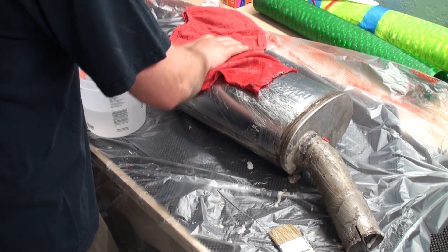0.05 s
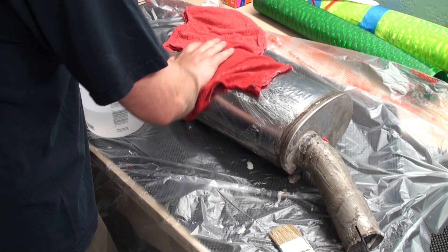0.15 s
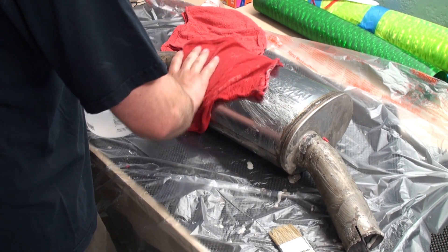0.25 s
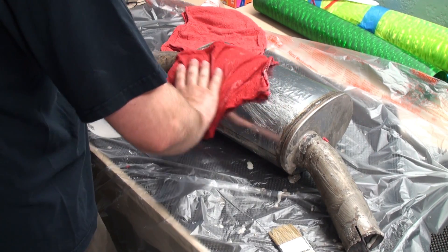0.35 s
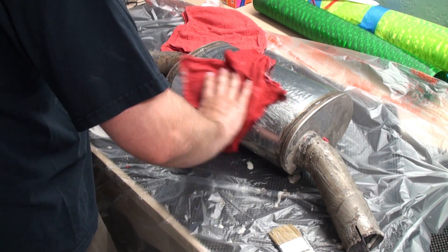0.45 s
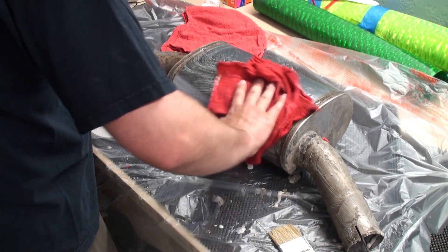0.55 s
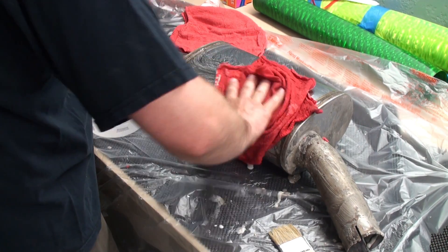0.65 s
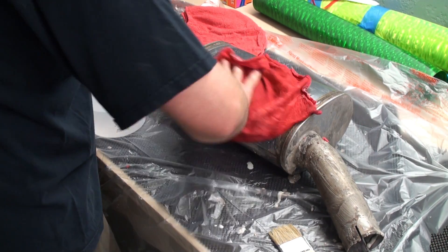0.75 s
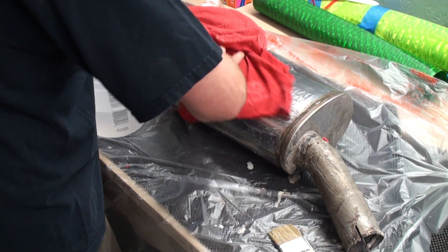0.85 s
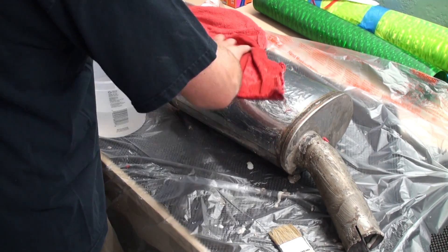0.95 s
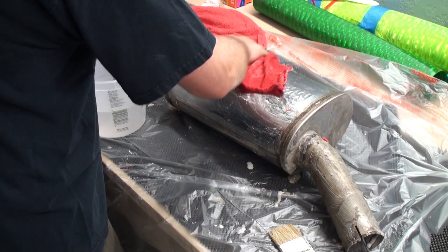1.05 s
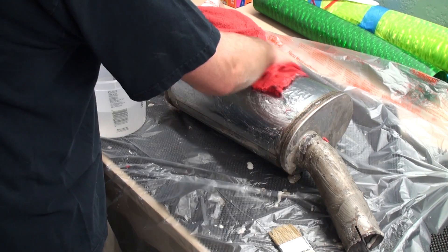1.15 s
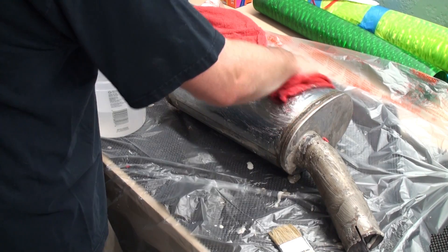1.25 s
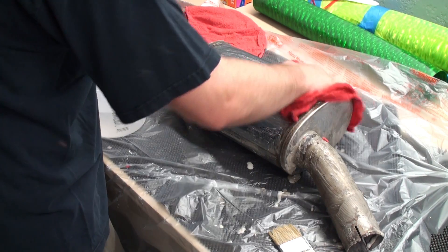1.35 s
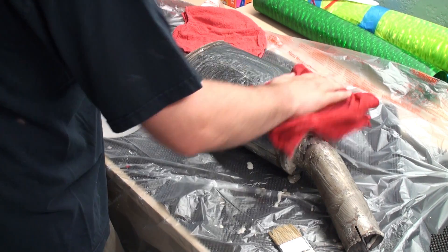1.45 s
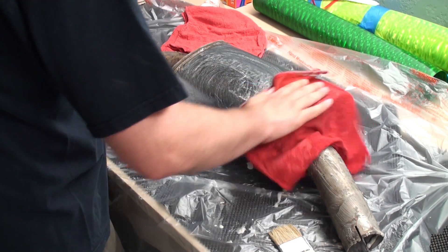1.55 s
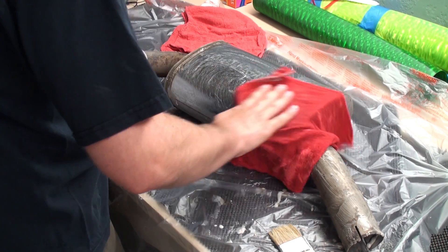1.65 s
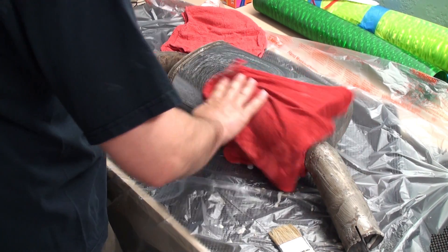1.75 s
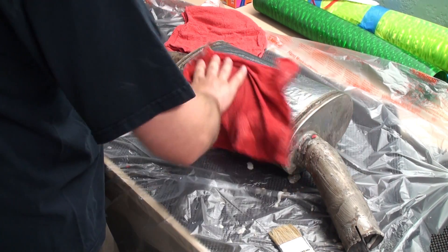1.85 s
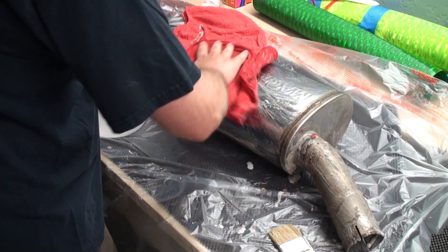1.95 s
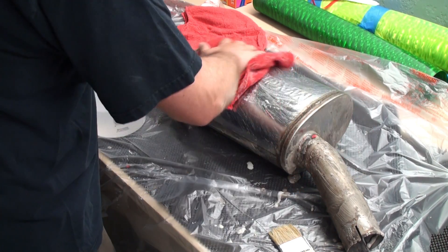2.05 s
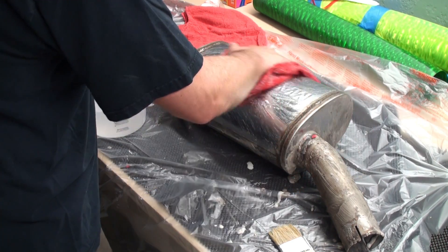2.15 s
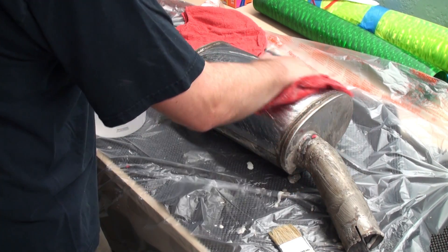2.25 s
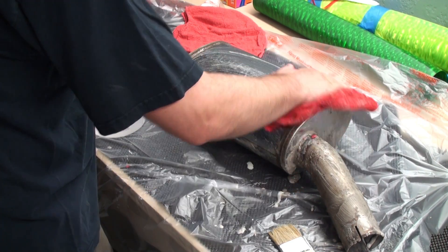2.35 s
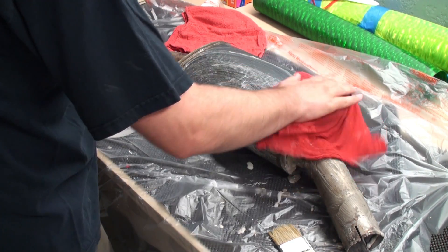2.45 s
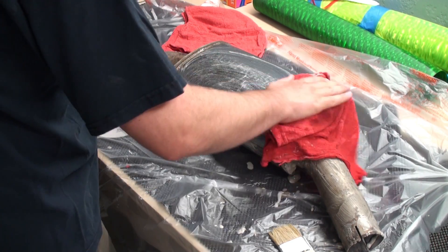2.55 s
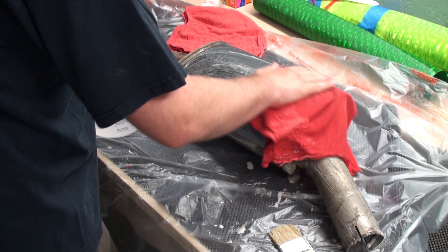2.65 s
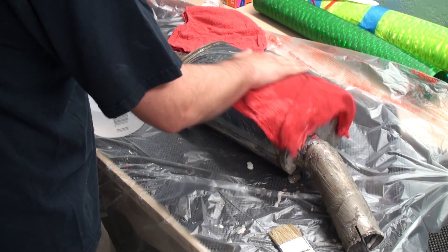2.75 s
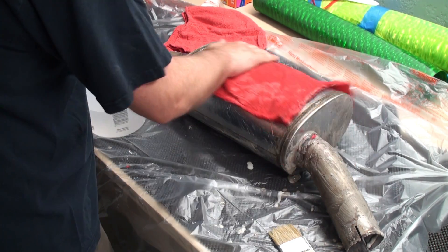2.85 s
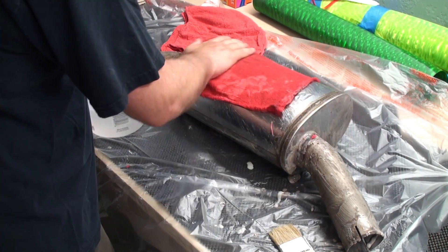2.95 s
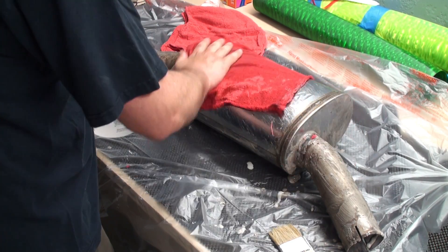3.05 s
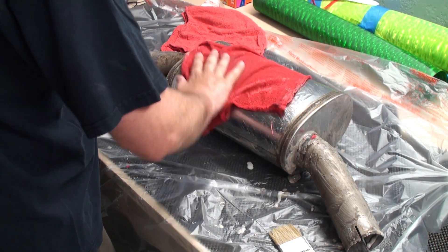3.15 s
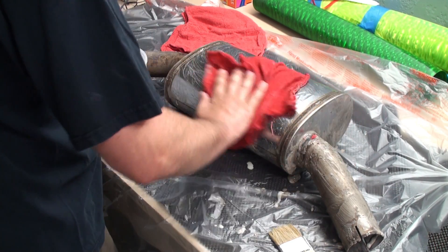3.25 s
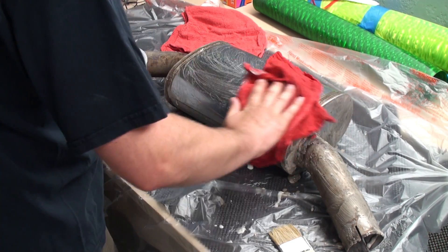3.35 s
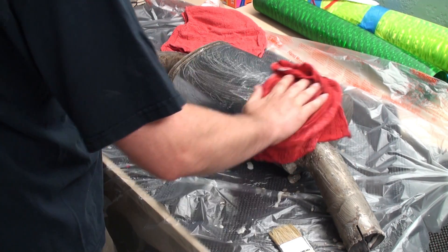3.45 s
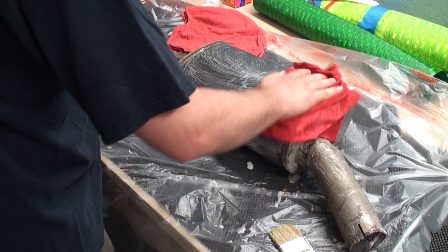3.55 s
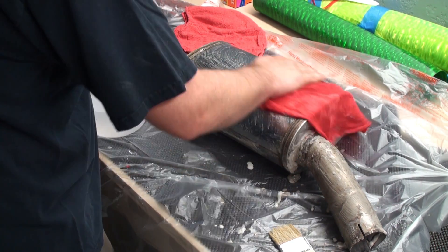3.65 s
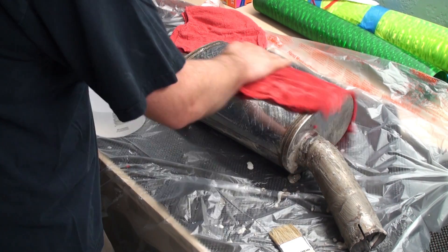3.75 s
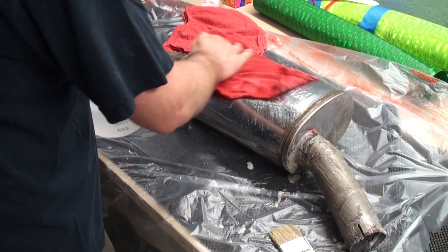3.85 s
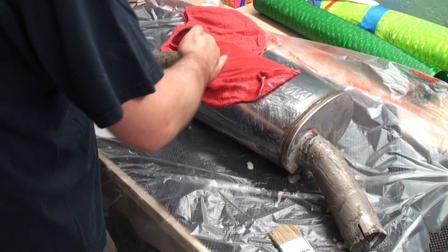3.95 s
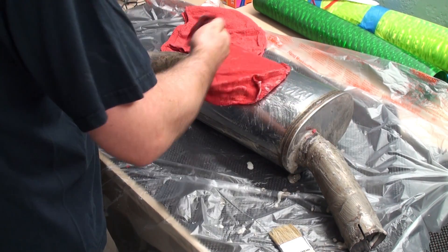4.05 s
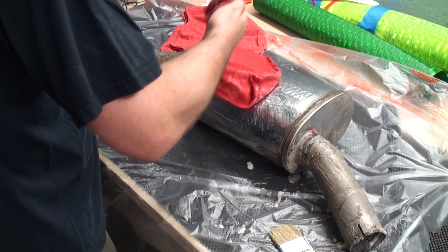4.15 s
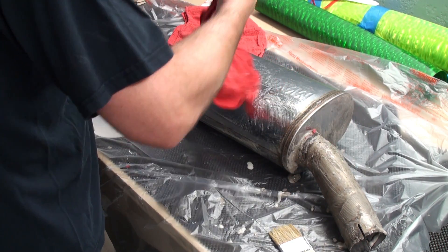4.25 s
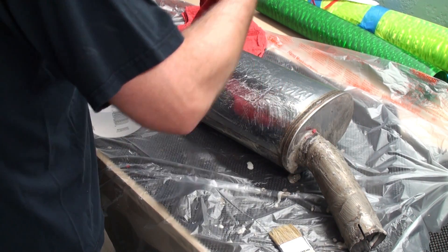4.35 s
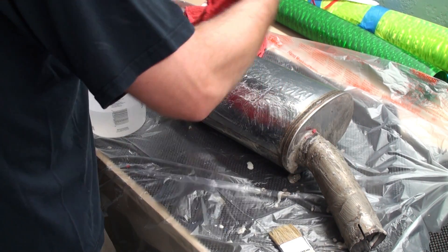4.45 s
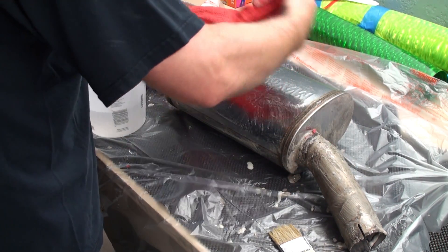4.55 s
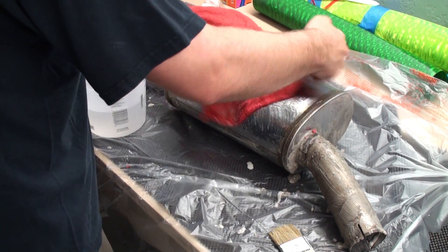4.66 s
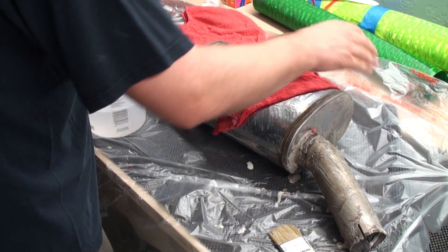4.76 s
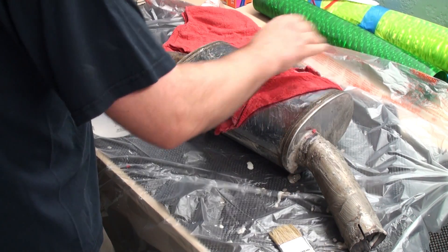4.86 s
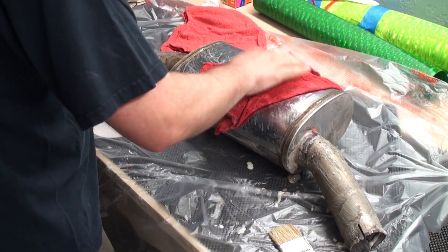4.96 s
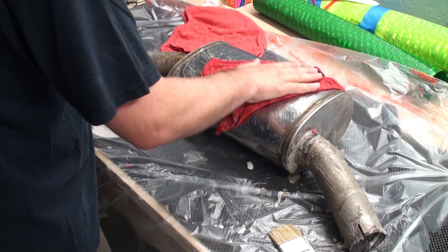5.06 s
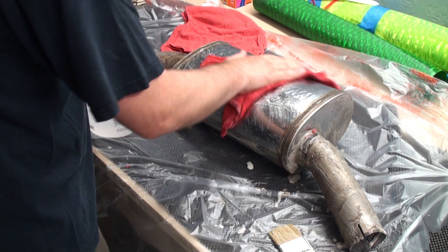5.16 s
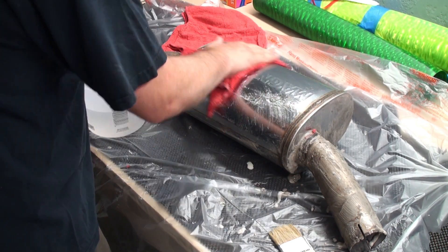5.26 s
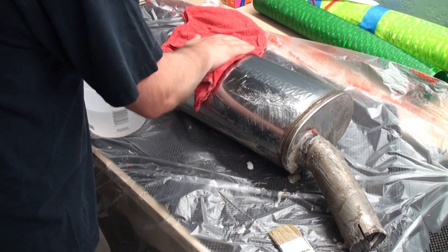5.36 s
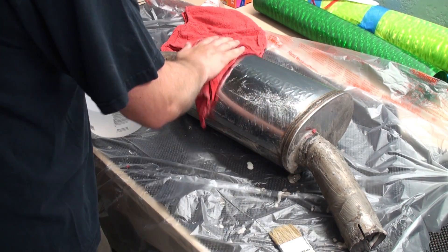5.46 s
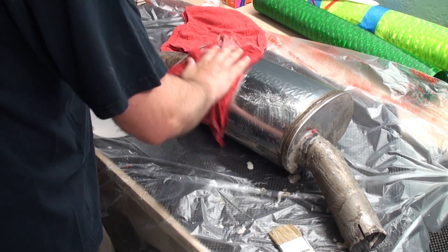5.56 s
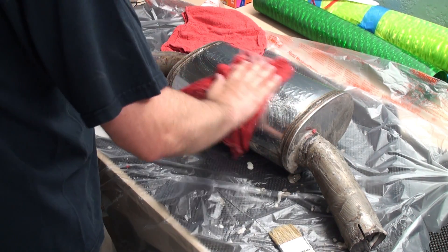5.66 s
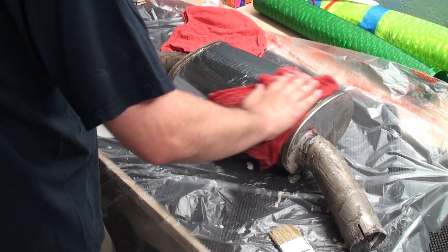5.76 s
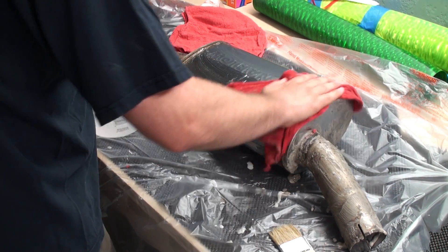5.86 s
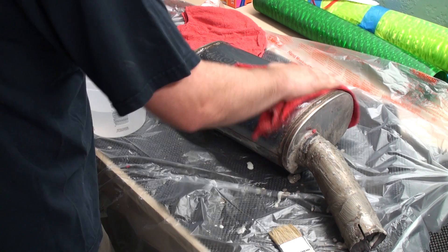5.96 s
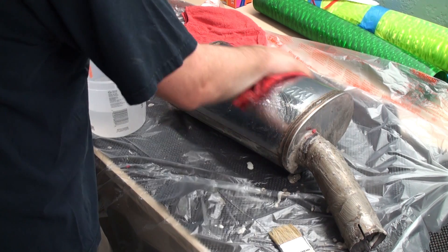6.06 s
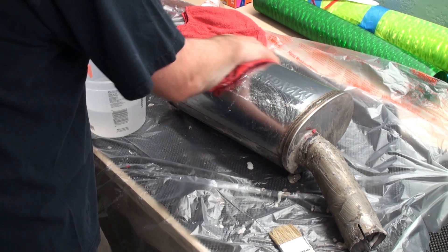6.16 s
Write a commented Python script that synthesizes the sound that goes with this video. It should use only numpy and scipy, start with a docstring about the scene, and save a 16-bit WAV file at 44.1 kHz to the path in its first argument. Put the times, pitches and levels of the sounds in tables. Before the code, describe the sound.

Wet scrubbing on a metal exhaust can lying on a bench, heard close with short room reflections. Swishing strokes rise and fall two or three times a second, bright and crackly with foam, over a soft hollow resonance. Two strong watery spurts stand out in the first half, along with tiny bubble pips and a thin squeak. Then comes a gap, one loud wet smack on the shell, a soft shuffle and renewed rubbing over faint room hum.

```python
"""Wet scrubbing hisses and fizzes back and forth over a steel muffler, above a low hum in a small workshop.
Dense crackles make the rag and suds, and each pass also sets the shell's damped modes ringing softly.
Shaped bursts of the same kind of grain squirt water out of the folds; damped tones add pips and nudges.
Near the end the scrubbing pauses, the rag slaps the metal once with a throbbing ring, and new passes follow."""
import sys
import numpy as np
from scipy import signal
from scipy.fft import rfft, irfft
from scipy.io import wavfile

SR = 44100
rng = np.random.default_rng(int(sys.argv[2]) if len(sys.argv) > 2 else 0)


def bounce(signal):
    """Save signal as a 16-bit WAV file at the path given by the first command-line argument."""
    frames = np.transpose(np.atleast_2d(signal))
    limited = np.clip(frames, -1, 1)
    pcm = np.round(limited * 32767).astype(np.int16)
    wavfile.write(sys.argv[1], SR, pcm)


N = 273420
TIME = np.arange(N) / SR
BINS = np.fft.rfftfreq(N, 1 / SR)


def amp(db):
    """Decibels to gain."""
    return 10 ** (np.asarray(db) / 20)


def unit(x):
    """Scales to rms 1."""
    return x / np.sqrt(np.mean(x ** 2) + 1e-20)


def read(points, hz):
    """Reads a table along a log-frequency axis."""
    f, value = np.transpose(points)
    return np.interp(np.log(hz + 1), np.log(f + 1), value)


def tilt(x, points):
    """Applies a table of gains in dB to the spectrum."""
    return irfft(rfft(x) * amp(read(points, BINS)), N)


def colour(x, points):
    """Gives a sound a spectrum, at rms 1."""
    return unit(tilt(x, points))


def wander(rate_hz):
    """Slow chance of rms 1, up to about the given rate."""
    return unit(irfft(rfft(rng.standard_normal(N)) / (1 + (BINS / rate_hz) ** 4), N))


def crackle(per_s, spread_db, share):
    """Tiny bursts of unequal size over a blur of countless smaller ones; share is the bursts' part of the power."""
    sizes = amp(spread_db * np.minimum(rng.exponential(1, N), 4))
    happens = rng.random(N) < per_s / SR
    clicks = sizes * rng.choice([-1., 1.], N) * happens
    share = np.clip(share, 0, 1)
    return np.sqrt(share) * unit(clicks) + np.sqrt(1 - share) * rng.standard_normal(N)


def burst(start_s, swell_s, decay_s):
    """An envelope that swells to 1 and dies away, falling to 1/e in decay_s."""
    age = np.maximum(TIME - start_s, 0)
    attack = np.sqrt(np.minimum(age / swell_s, 1))
    return attack * np.exp(-np.maximum(age - swell_s, 0) / decay_s)


def pings(rows, swell_s):
    """Single damped sine tones, each under its own burst."""
    return sum(amp(db) * burst(s, swell_s, decay) * np.sin(2 * np.pi * hz * (TIME - s))
               for s, hz, db, decay in rows)


# stereo spread of the moving source: pitch_hz [Hz], side_against_common_db [dB]
WIDTH = [(200, -43), (1000, -12), (3000, -39.5), (6500, -49), (8200, -19), (10000, -8.5), (12000, -4.5),
         (13500, -6.5), (15800, -5)]


def wet(grains, points):
    """Coloured grains at the two microphones, each grain leaning a little to one side; common sound at rms 1."""
    side = tilt(grains * rng.standard_normal(N), WIDTH)
    pair = tilt(np.array([grains + side, grains - side]), points)
    return pair / np.std(pair.mean(0))


# mains and motor tones: pitch_hz [Hz], level_db [dB rms]
HUM_TONES = [(58, -66), (89, -68), (120, -61), (138.7, -58), (240, -79.5)]
# colour of the room's rush: pitch_hz [Hz], relative_level_db [dB per Hz]
AIR_COLOUR = [(20, -18), (36, -10), (60, -15), (80, -12), (130, 3.5), (180, -0.5), (300, -7), (450, -10),
              (1000, -11), (2000, -12.5), (4000, -18), (8000, -21), (12000, -22.5), (15800, -29)]
# how far the rush spreads: pitch_hz [Hz], side_against_common_db [dB]
AIR_SPREAD = [(110, -53), (200, -28), (400, -4.5), (700, 0), (4500, -0.5), (15800, -7)]


def background(air_db=-57, waver_rad=0.15):
    """A hum of sines with slightly wavering phase, over coloured noise that comes from all sides."""
    hum = np.zeros(N)
    for hz, db in HUM_TONES:
        phase = 2 * np.pi * (hz * TIME + rng.random()) + waver_rad * wander(rate_hz=2.2)
        hum += amp(db) * np.sqrt(2) * np.sin(phase)
    common = colour(rng.standard_normal(N), AIR_COLOUR)
    side = tilt(colour(rng.standard_normal(N), AIR_COLOUR), AIR_SPREAD)
    return hum + amp(air_db) * np.array([common + side, common - side])


# loudness of the reflections: pitch_hz [Hz], echo_level_db [dB]
ROOM_LEVEL = [(60, -49), (150, -24), (280, -11), (1000, -21.5), (2000, -10.5), (4000, -12), (6500, -18.5),
              (9000, -11.5), (15800, -23)]
# length of the reflections: pitch_hz [Hz], t60_s [s]
ROOM_DECAY = [(200, 0.71), (2000, 0.48), (7000, 0.17), (15800, 0.23)]


def room(x):
    """Bench and wall reflections as decaying noise, different at each microphone, treble shorter than bass."""
    hz, t, z = signal.stft(rng.standard_normal((2, SR // 2)), SR, nperseg=256)
    t60_s = read(ROOM_DECAY, hz)[:, None]
    energy = SR * t60_s / np.log(10 ** 6)  # keeps a long tail from sounding louder
    tail = signal.istft(z * amp(-60 * t / t60_s) / np.sqrt(energy), SR, nperseg=256)[1]
    sent = tilt(x.mean(0), ROOM_LEVEL)
    return signal.fftconvolve(sent[None], tail, axes=1)[:, :N]


# dull knocks of the bench: start_s [s], pitch_hz [Hz], level_db [dB], decay_s [s to 1/e]
NUDGES = [(0.22, 60, -51, .05), (1.2, 64, -50, .05), (2.43, 60.4, -51, 0.044), (3.92, 57.4, -54, 0.093),
          (4.27, 59, -54, .08), (5.09, 62.4, -46.5, .05), (5.205, 62.3, -48, 0.058)]


def nudges():
    """The bench gives low, damped thuds when nudged."""
    return pings(NUDGES, swell_s=0.015)


# small pips: two low bubbles and a thin 3 kHz squeak of the cloth:
# start_s [s], pitch_hz [Hz], level_db [dB], decay_s [s to 1/e]
PIPS = [(2.82, 1480, -42, 0.0074), (2.833, 818, -44, 0.013), (3.55, 3070, -40, .03)]


def pips():
    """Two bubbles and a squeak of the cloth, each a short damped tone."""
    return pings(PIPS, swell_s=0.0093)


# modes of the muffler, damped by wet cloth: pitch_hz [Hz], relative_level_db [dB], t60_s [s]
SHELL_MODES = [(248.7, -11, 0.39), (259.6, -12, 0.23), (472.5, -5, 0.14), (519, -1.5, 0.14),
               (574.8, 2, 0.17), (589, 0, 0.091), (613, -0.5, 0.19), (653, -15, 0.086), (794, -1, 0.2),
               (1003, -0.5, 0.06), (1245, -6.5, 0.21), (1364, -9, 0.25), (1495, 1, 0.11),
               (1960, -3.5, 0.092), (2140, -20, 0.23), (2660, -17, 0.1)]


def shell(push):
    """The muffler's modes ring under a push; steady noise keeps its level."""
    t = TIME[:SR // 2]
    ring = sum(amp(db - 60 * t / t60) * np.cos(2 * np.pi * hz * t) for hz, db, t60 in SHELL_MODES)
    return signal.fftconvolve(push, ring / np.linalg.norm(ring))[:N]


# a light early flop, then the main slap and its throbbing tail:
# start_s [s], smack_db [dB], decay_s [s to 1/e], blow_to_shell_db [dB]
SLAPS = [(3.69, -44, 0.043, -18), (4.743, -35, 0.03, -10), (4.768, -45.5, 0.075, -19), (4.8, -72, .02, -21),
         (4.822, -62, 0.064, -24)]
# colour of the wet smack: pitch_hz [Hz], relative_level_db [dB per Hz]
SMACK_COLOUR = [(100, -27), (250, 2), (370, -1), (560, 9.5), (760, -4.5), (1000, 2.5), (1500, -3),
                (2500, -3.5), (6000, -5.5), (9000, -10.5), (12000, -20), (15800, -32)]


def slaps(swell_s=0.0013, contact_s=0.00061, settle_db=-25, settle_decay_s=0.018):
    """Wet smacks and blows on the shell; the later rows imitate the throb of close modes beating after one slap."""
    splat = wet(crackle(per_s=8400, spread_db=9.0, share=0.17), SMACK_COLOUR)
    smack = sum(amp(db) * burst(s, swell_s, decay) for s, db, decay, _ in SLAPS)
    settling = amp(settle_db) * rng.standard_normal(N)  # relative to the blow
    push = np.zeros(N)
    for s, _, _, blow_db in SLAPS:
        blow = np.exp(-((TIME - s - swell_s) / contact_s) ** 2)
        push += amp(blow_db) * (blow / blow.sum() + settling * burst(s, swell_s, settle_decay_s))
    return smack * splat + shell(push)


# water leaving the rag, small spits to full squirts:
# start_s [s], level_db [dB], swell_s [s], decay_s [s to 1/e], gurgle_against_spray_db [dB]
SQUISHES = [(0.57, -39, 0.027, 0.038, -21), (0.687, -38.5, 0.0041, 0.024, -11),
            (1.28, -38, 0.036, 0.06, -25), (1.645, -24, 0.0039, 0.044, -8.5), (1.827, -34, .003, .01, -22),
            (2.577, -25, 0.00087, 0.0067, -5.5), (2.582, -20.5, 0.0079, 0.068, -10.5),
            (2.765, -41, .002, 0.012, -23), (3.11, -39, 0.032, .035, -13), (3.684, -27, 0.0056, 0.023, -22),
            (3.965, -35, 0.019, 0.025, -27), (4.697, -51, .004, 0.072, -2),
            (5.352, -33.5, 0.017, 0.053, -9.5), (5.65, -42, .01, .025, -18),
            (5.765, -36.5, 0.026, 0.049, -27)]
# colour of droplets and popping foam, also used by the scrubbing: pitch_hz [Hz], relative_level_db [dB per Hz]
SPRAY_COLOUR = [(300, -78), (1200, -31), (2500, -18.5), (4000, -4.5), (7200, 1.5), (9500, -1.5),
                (11500, -4), (13500, -11.5), (15800, -24)]
# colour of the lower gurgle: pitch_hz [Hz], relative_level_db [dB per Hz]
GURGLE_COLOUR = [(150, -20), (400, -7), (700, -10.5), (950, -3), (1400, -2), (2400, 1), (3500, 1.5),
                 (6000, -15), (15800, -40)]


def squishes():
    """Pressed folds spit a dense spray of droplets, with a lower gurgle when they hold much water."""
    spray = wet(crackle(per_s=3500, spread_db=0.5, share=0.71), SPRAY_COLOUR)
    gurgle = wet(crackle(per_s=1800, spread_db=1.0, share=0.14), GURGLE_COLOUR)
    return sum(amp(db) * burst(s, swell, decay) * (spray + amp(gurgle_db) * gurgle)
               for s, db, swell, decay, gurgle_db in SQUISHES)


# how far a pass has fallen at its nominal ends, and how round its top is
TURN_DB, STROKE_ARCH = 6.5, 1.8


def sweep(peak_s, rise_s, fall_s):
    """Loudness of one pass: the hand speeds up, then slows to turn round."""
    away = np.maximum((peak_s - TIME) / rise_s, (TIME - peak_s) / fall_s)
    return amp(-TURN_DB * np.minimum(away, 10) ** STROKE_ARCH)


def linger(gain, power_fade_s=0.11):
    """A level that follows the rubbing late; its power fades slowly afterwards."""
    keep = np.exp(-1 / (power_fade_s * SR))
    return np.sqrt(signal.lfilter([1 - keep], [1, -keep], gain ** 2))


# passes of the rag, before each layer's trim; the last three levels are relative to level_db:
# fastest_s [s], rise_s [s], fall_s [s], level_db [dB], scrape_db [dB], fizz_db [dB], weight_on_shell_db [dB]
STROKES = [(0.15, 0.27, 0.26, -35.5, 0, -1, -22.5), (0.57, 0.11, 0.094, -39.5, -7, 0, -19.5),
           (0.79, 0.077, 0.086, -42.5, -6, 3, -13.5), (0.98, 0.096, 0.15, -40.5, 2, 3.5, -20.5),
           (1.22, 0.24, 0.34, -37.5, -2, 1.5, -18), (1.61, 0.16, 0.18, -35, -2.5, -7, -32),
           (1.83, 0.3, 0.17, -40, -2, 5.5, -16), (2.08, 0.13, 0.14, -38.5, 0, 1, -15.5),
           (2.4, 0.2, 0.3, -37.5, 0.5, 0.5, -18), (2.83, 0.2, 0.3, -40.5, 3, 1.5, -13.5),
           (3.16, 0.26, 0.17, -40, -4, 2, -24), (3.38, .1, 0.067, -38, -19, 2.5, -19),
           (3.5, 0.068, 0.24, -35, -4, -3, -22.5), (3.8, 0.3, 0.22, -39.5, 2, 4, -13),
           (3.96, 0.072, 0.062, -41.5, 3, 9, -9.5), (5.37, 0.15, .13, -43, 4, 1.5, -9.5),
           (5.57, 0.099, 0.038, -46.5, 5, 4, -27), (5.82, 0.26, 0.21, -40.5, 3.5, 1, -14),
           (6.19, 0.14, .15, -39, 3, 4.5, -12)]
# colours of wet threads, coarse weave, suds and dragging hand: pitch_hz [Hz], relative_level_db [dB per Hz]
HISS_COLOUR = [(200, -35), (900, -17), (2000, -8.5), (3200, -3.5), (4500, -0.5), (6000, 2), (7300, 1),
               (8500, -5), (10000, -7), (12000, -11.5), (15800, -25.5)]
SCRAPE_COLOUR = [(120, -10), (250, -2.5), (380, -10), (520, 1.5), (730, -2.5), (1000, 0), (1500, 3),
                 (2400, 4.5), (3500, 6), (6000, 3.5), (15800, -24)]
FIZZ_COLOUR = [(500, -64), (5000, -8), (8000, 5.5), (9800, -0.5), (11300, 0.5), (12500, -4.5), (14000, -9),
               (15800, -18)]
RUMBLE_COLOUR = [(30, -9), (60, 6), (100, 4), (250, -10.5), (330, 2), (450, -14), (700, -0.5), (1200, -7),
                 (4000, -60)]


def stroke_levels(bite_lead_s=0.017):
    """Sums the power of all passes into levels for rub, coarse weave, foam and weight."""
    # the hand comes down on the dropped rag, which shifts wetly in every layer
    settle = amp(-58) * burst(start_s=5.07, swell_s=0.018, decay_s=0.059)
    power = np.tile(settle ** 2, (4, 1))
    for s, rise, fall, db, scrape_db, fizz_db, weight_db in STROKES:
        glide = amp(db) * sweep(s, rise, fall)
        bite = amp(db) * sweep(s - bite_lead_s, rise, fall)  # the weave bites before the cloth glides
        power += np.square([glide, amp(scrape_db) * bite, amp(fizz_db) * glide, amp(weight_db) * glide])
    return np.sqrt(power)


def scrubbing(slow_db=0.52, fast_db=0.05, lean_db=1.5):
    """Wet threads catch and let go on the steel, suds burst between them, and the shell answers."""
    rub, coarse, foam, weight = stroke_levels()
    # folds of cloth drag unevenly
    grip = amp(slow_db * wander(rate_hz=20) + fast_db * wander(rate_hz=200))
    hiss = amp(-0.7) * rub * wet(crackle(per_s=3500, spread_db=-2.0, share=0.48), HISS_COLOUR)
    scrape = amp(-8.0) * coarse * wet(crackle(per_s=1200, spread_db=3.0, share=0.31), SCRAPE_COLOUR)
    fizz = amp(-4.5) * foam * wet(crackle(per_s=3000, spread_db=-3.0, share=0.68), FIZZ_COLOUR)
    # foam left on the steel goes on popping after a pass
    suds = amp(-14) * linger(rub) * wet(crackle(per_s=2000, spread_db=2.0, share=0.44), SPRAY_COLOUR)
    # sparser, larger bubbles snap under the cloth
    drips = amp(-25) * rub * wet(crackle(per_s=25, spread_db=-3.0, share=0.91), SPRAY_COLOUR)
    # the hand's shifting weight both rings the shell and rumbles through the bench
    weight = weight * amp(lean_db * wander(rate_hz=16))
    ring = shell(amp(-1.0) * weight * crackle(per_s=300, spread_db=3.0, share=0.77))
    rumble = amp(-5.5) * weight * colour(rng.standard_normal(N), RUMBLE_COLOUR)
    return grip * (hiss + scrape + fizz) + suds + drips + ring + rumble


def scene():
    """All the sources in the workshop, with its reflections."""
    dry = background() + nudges() + pips() + slaps() + squishes() + scrubbing()
    return dry + room(dry)


# unlike colour of the two microphones: pitch_hz [Hz], left_minus_right_db [dB]
BALANCE = [(200, 0), (1000, .9), (4000, .4), (8000, .3), (10000, -1.2), (11800, -2.8), (14500, -1)]
EDGE_HZ = 15800


def record(dry):
    """Two close microphones of slightly unlike colour, then a low-pass at the band edge."""
    lean_db = read(BALANCE, BINS) * np.array([[.5], [-.5]])
    pair = irfft(rfft(dry) * amp(lean_db), N)
    low_pass = signal.firwin(1023, EDGE_HZ, window=("kaiser", 9), fs=SR)
    return signal.oaconvolve(pair, low_pass[None], "same")


dry = scene()
out = record(dry)
bounce(out)
```